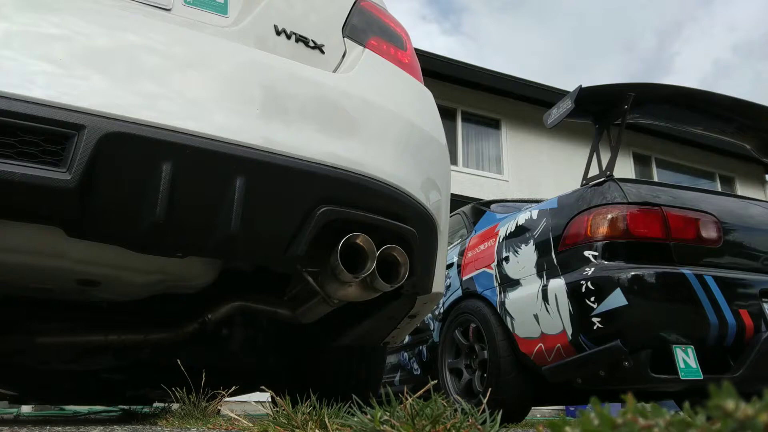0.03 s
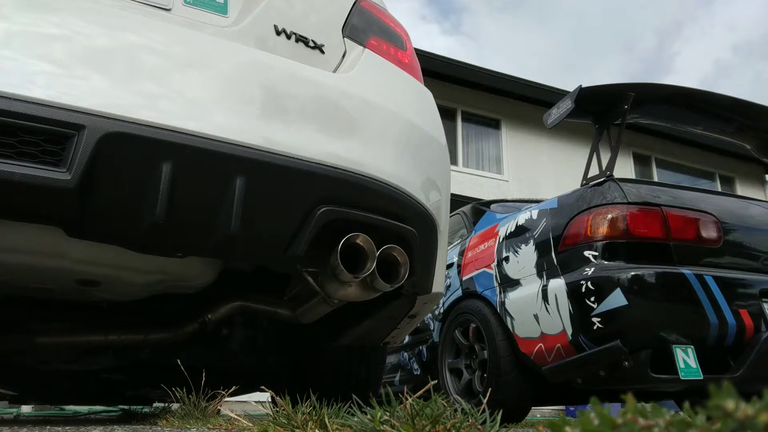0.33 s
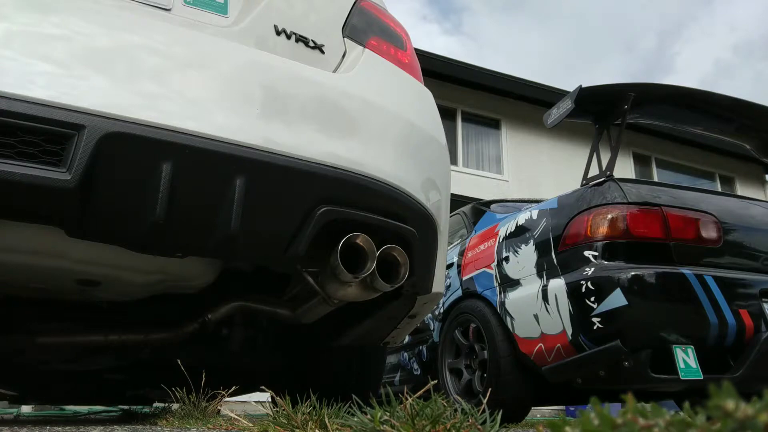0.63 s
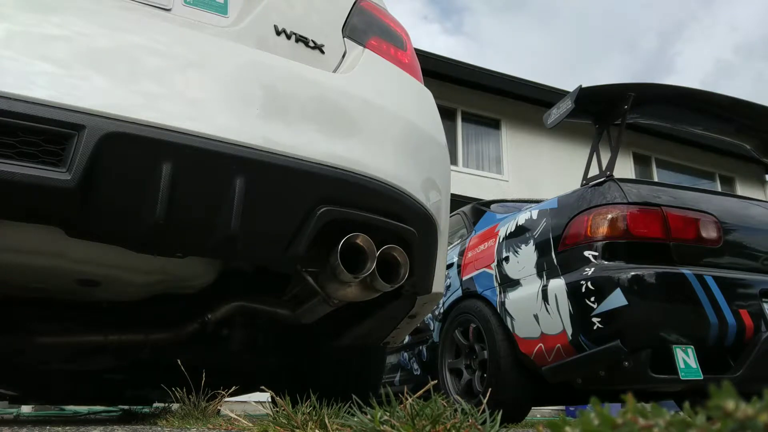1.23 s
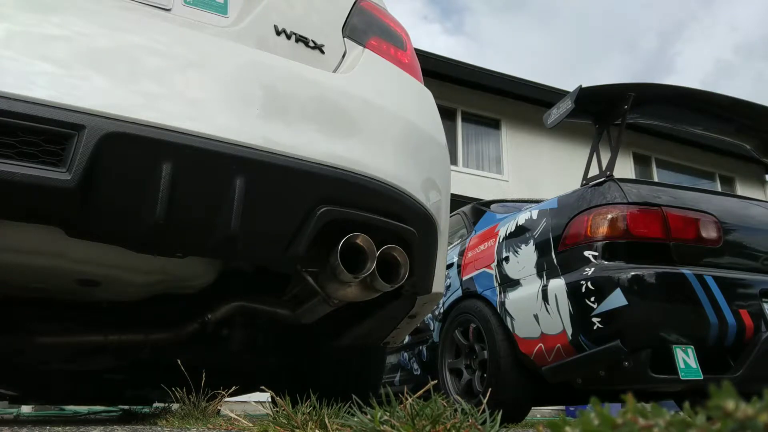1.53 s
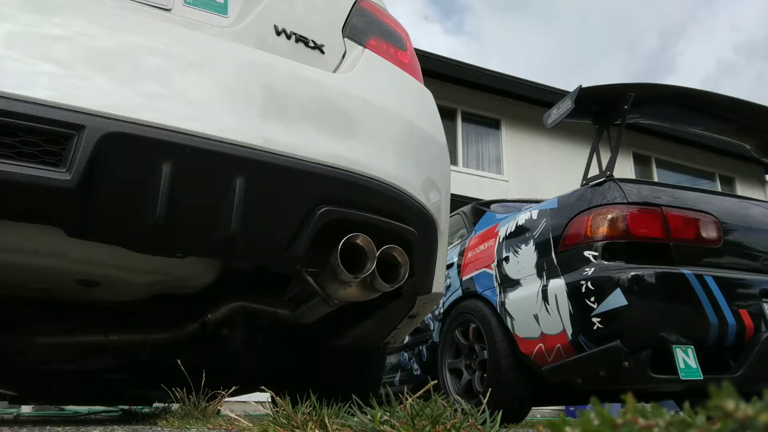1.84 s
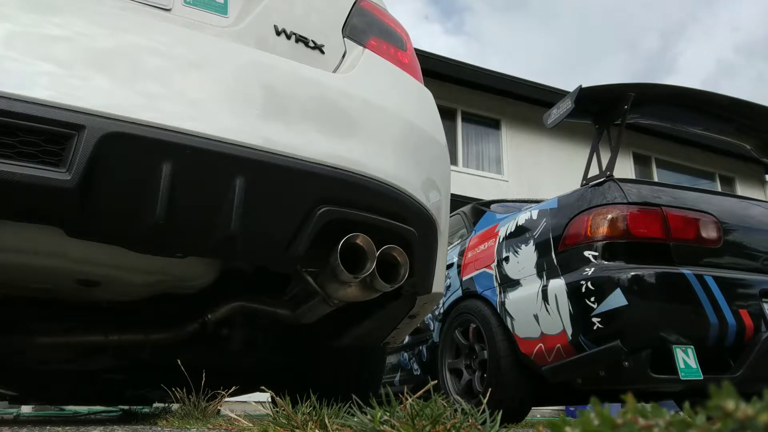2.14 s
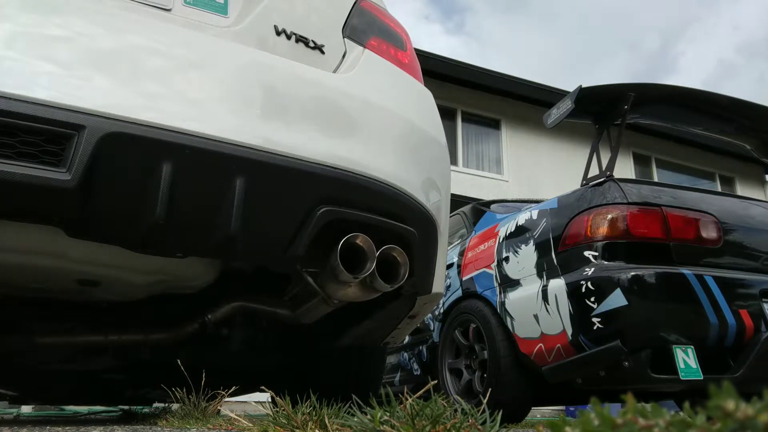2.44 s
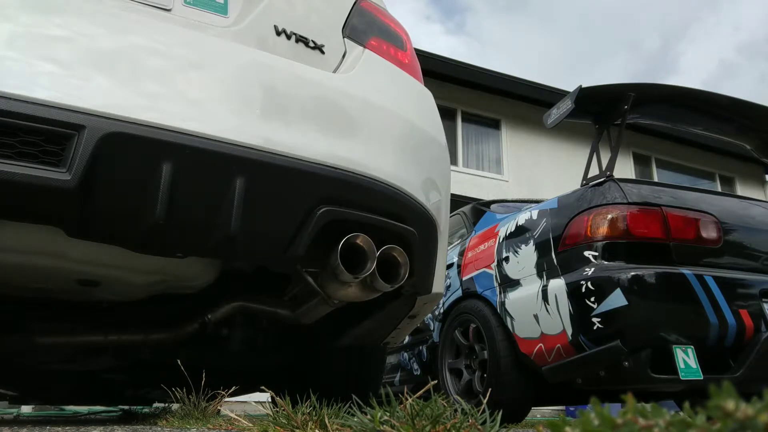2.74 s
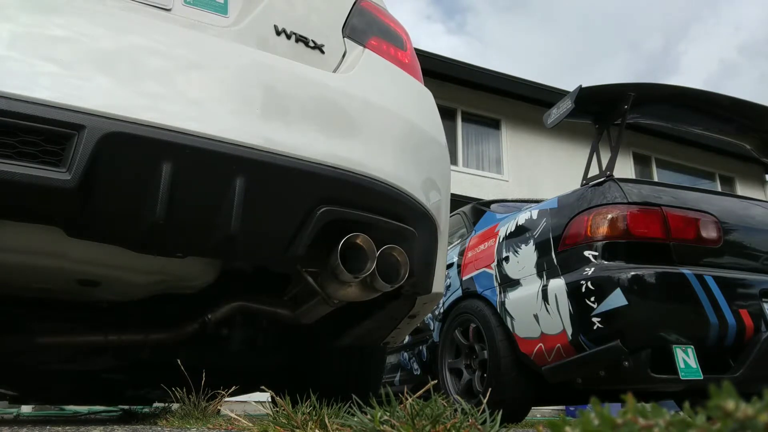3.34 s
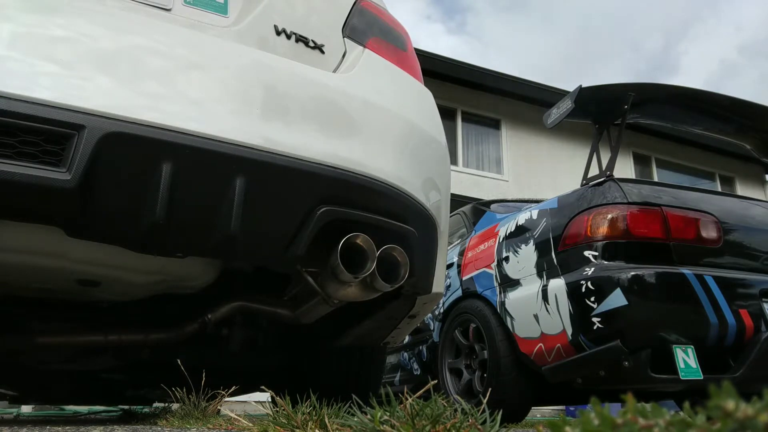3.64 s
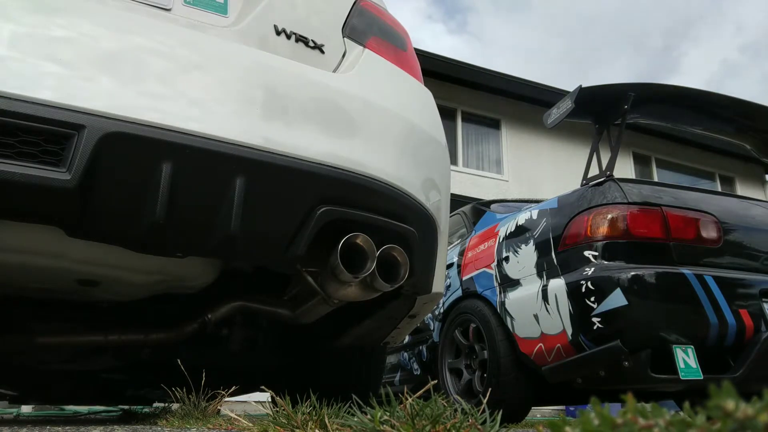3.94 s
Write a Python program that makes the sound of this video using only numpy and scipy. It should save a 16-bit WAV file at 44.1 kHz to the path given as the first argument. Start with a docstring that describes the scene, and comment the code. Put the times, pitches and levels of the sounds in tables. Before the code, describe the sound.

A car engine starts from cold, heard outdoors close to the tailpipes. At first there is only a quiet low rumble, joined at about 1.2 seconds by a faint, thin fuel pump whine and soft clunks. At 1.7 seconds the starter clacks in, grinding and rattling. The engine catches at 2.4 seconds with a few thumps, climbing by 3 seconds to a loud, uneven, raspy fast idle that continues.

```python
"""A flat-four car engine starts from cold, heard outdoors close to its tailpipes.
First the fuel pump whines, then the starter clacks in and its gears grind. The engine catches
with a few slow thumps and climbs to a hard, uneven fast idle: four unequal cylinders take turns
sending pulses of gas down the exhaust pipe. A low rumble lies behind it all."""
import sys
import numpy as np
from scipy import signal
from scipy.io import wavfile

SR = 44100
rng = np.random.default_rng(int(sys.argv[2]) if len(sys.argv) > 2 else 0)


def log_audio(samples):
    """Write samples as a 16-bit WAV file to the path given in sys.argv[1]."""
    # one column per channel
    frames = np.atleast_2d(samples).T
    # limit to full scale, then quantise
    limited = np.clip(frames, -1, 1)
    pcm = np.round(limited * 32767).astype(np.int16)
    wavfile.write(sys.argv[1], SR, pcm)


N = 176400
TIME = np.arange(N) / SR
MS = .001
FIRST_FIRING_S = 2.4319

# How fast the engine runs. Each row: time in seconds, firings per second.
ENGINE_SPEED = [(2.433, 17.87), (2.485, 20.52), (2.54, 37.25), (2.62, 44.45), (2.7, 53.53), (2.8, 62.79),
                (2.9, 67.33), (3.08, 72.19), (3.2, 70.52), (3.42, 73.45), (3.62, 72.3), (3.8, 73.51),
                (4.0, 74.39)]


def exhaust():
    """Four unequal cylinders fire in turn; each pulse booms, barks, burbles and rasps in the pipe."""
    # The cylinders in firing order. Each row: bark and rasp offsets in dB (before unevenness scales
    # them), lateness in ms, delay in ms of the echo in the header pipe, that echo's share of the pulse.
    cylinders = [(3.5, 5.5, 0.12, 3.22, 0.081), (0, -4, 0.016, 4.49, 0.04), (3.5, 2, 0.23, 0.96, 0.033),
                 (1, 2, -0.062, 2.3, 0.033)]
    # How much strong and weak cylinders differ. Each row: time in seconds, multiplier of the offsets.
    unevenness = [(2.5, 0.21), (2.9, 0.24), (3.0, 1.17), (3.26, 1.12), (3.4, 1.06), (3.7, 1.46),
                  (3.8, 1.85)]
    rate = curve(ENGINE_SPEED)
    progress = np.cumsum(rate * (TIME >= FIRST_FIRING_S)) / SR  # goes up by one per firing
    firings = np.arange(int(progress[-1]) + 1)
    at = np.searchsorted(progress, firings, side="right").clip(0, N - 1)  # sample of each firing
    bark_db, rasp_db, late_ms, echo_ms, echo_share = np.array(cylinders)[firings % len(cylinders)].T
    bark_scatter, rasp_scatter, jitter = rng.standard_normal((3, len(firings)))
    times = TIME[at] + (late_ms + .025 * jitter) * MS
    size = np.sqrt(SR / rate[at])  # faster firing alone does not add loudness
    uneven = curve(unevenness)[at]
    booms = boom(times, at, size)
    barks = bark(times, at, size * amp(uneven * bark_db + .45 * bark_scatter), echo_ms, echo_share)
    burbles = burble(times, at, size * amp(uneven * bark_db))
    rasps = rasp(times, at, size * amp(uneven * rasp_db + 1.2 * rasp_scatter))
    echoes = yard_echoes(amp(-27) * barks + amp(-7) * rasps)
    return booms + barks + burbles + rasps + echoes


def boom(times, at, size):
    """Each pulse of gas rings the low notes of the pipe and silencer."""
    # The boom's loudness. Each row: time in seconds, level in dB.
    levels = [(2.43, -28.5), (2.49, -22.5), (2.6, -21.5), (2.65, -16.5), (2.73, -21), (2.88, -18),
              (2.99, -19), (3.2, -18.5), (3.4, -17.5), (3.65, -19), (4, -17.5)]
    # The pipe's low ring. Each row: frequency in Hz, relative level in dB.
    tone = [(20, -64), (36, -17), (52, -4.5), (72, 0), (95, -1.5), (124, 6.5), (147, -13.5), (168, 0.5),
            (195, -26.5), (260, -14), (500, -81.5), (1000, -90), (12000, -130)]
    return colour(clicks(times, size * amp(curve(levels)[at])), tone)


def bark(times, at, size, echo_ms, echo_share):
    """Each pulse and its echo in the header pipe ring the exhaust's middle notes."""
    # The bark's loudness. Each row: time in seconds, base level in dB.
    levels = [(2.43, -45), (2.49, -46), (2.525, -30), (2.59, -42.5), (2.7, -29.5), (2.81, -41.5),
              (2.9, -23), (3.0, -30), (3.22, -26), (3.46, -19.5), (3.54, -21), (3.64, -25.5), (3.77, -21),
              (4, -22.5)]
    # The pipe's middle ring. Each row: frequency in Hz, relative level in dB.
    tone = [(100, -42), (190, -16.5), (220, -13.5), (250, -11), (292, -3), (325, 3), (360, -24), (440, 3),
            (480, 4.5), (515, 0.5), (585, 2.5), (665, -6.5), (740, -7), (850, -10.5), (990, -20),
            (1100, -9), (1280, -39.5), (1500, -48), (3000, -73.5), (12000, -115)]
    strength = size * amp(curve(levels)[at])
    pulses = clicks(times, strength) + clicks(times + echo_ms * MS, strength * echo_share)
    return colour(pulses + .03 * puffs(pulses, decay_s=.007), tone)


def burble(times, at, size):
    """Rough gas follows each pulse, strongest while the cold engine is still settling."""
    # The burble's loudness. Each row: time in seconds, base level in dB.
    levels = [(2.43, -46), (2.53, -32), (2.6, -37), (2.7, -33), (2.82, -35), (2.9, -27), (3.0, -31),
              (3.12, -30.5), (3.3, -31), (3.6, -34), (4, -34)]
    # The burble's tone. Each row: frequency in Hz, relative level in dB.
    tone = [(120, -24), (200, -14), (290, 4.5), (360, 2), (450, 7), (580, -14), (720, 1), (850, -8.5),
            (1000, -14.5), (1500, -53), (3000, -76), (12000, -110)]
    pulses = clicks(times, size * amp(curve(levels)[at]))
    return colour(puffs(pulses, decay_s=.012), tone)


def rasp(times, at, size):
    """A sharp crack and a puff of gas just after each firing ring the pipe's upper notes."""
    # The rasp's loudness. Each row: time in seconds, base level in dB.
    levels = [(2.43, -51.5), (2.487, -42.5), (2.525, -39), (2.6, -45), (2.7, -40.5), (2.83, -42),
              (2.92, -39.5), (3.1, -37.5), (3.42, -32), (3.66, -37.5), (3.77, -33), (4, -35)]
    # The pipe's upper ring. Each row: frequency in Hz, relative level in dB.
    tone = [(300, -11.5), (600, -11), (830, 7.5), (990, -5.5), (1100, 4.5), (1280, -7.5), (1450, -16),
            (1750, -25.5), (2100, -23), (2500, -31), (2900, -20.5), (3700, -39), (5000, -57), (9000, -62.5),
            (12000, -91.5)]
    cracks = clicks(times + 1.1 * MS, size * amp(curve(levels)[at]))
    return colour(.9 * cracks + .6 * puffs(cracks, decay_s=.007), tone)


def tailpipe_hiss():
    """Gas hisses out of the tailpipes, louder as the engine speeds up."""
    # The hiss's tone. Each row: frequency in Hz, relative level in dB.
    tone = [(1470, -26.5), (2500, -7.5), (2850, -5), (3540, -10.5), (4660, -19.5), (5450, -15.5),
            (7480, -21), (8380, -23), (9170, -16.5), (10500, -49), (13600, -61), (22000, -120)]
    rate = curve(ENGINE_SPEED)
    flow = (TIME > FIRST_FIRING_S) * np.sqrt(rate / rate.max())
    return amp(-59) * colour(noise(), tone) * flow


def starter():
    """The starter's gears grind and whine and its housing rings, while the turning engine chugs."""
    # The grinding's loudness. Each row: time in seconds, base level in dB.
    grind_levels = [(1.683, -70), (1.695, -52), (1.76, -47.5), (1.82, -45), (1.86, -44.5), (1.96, -42.5),
                    (2.04, -42.5), (2.11, -47), (2.16, -46.5), (2.3, -46.5), (2.41, -40), (2.5, -46.5),
                    (2.6, -47), (2.65, -60), (2.75, -69)]
    # The grinding's tone. Each row: frequency in Hz, relative level in dB.
    grind_tone = [(240, -40.5), (400, -13.5), (540, -2.5), (663, -15.5), (781, 4.5), (999, -19), (1230, 1),
                  (1440, -15.5), (1680, -13.5), (2460, -1.5), (2940, -8.5), (3410, -4.5), (4490, -13),
                  (5890, -8), (6400, -13.5), (6940, -9.5), (8290, -7), (9380, -18.5), (10500, -27),
                  (13600, -54.5), (22000, -120)]
    # The housing's notes. Each row: frequency in Hz, width in Hz, level in dB relative to the grinding.
    housing_notes = [(800, 36, -20), (941, 80, -14), (2513, 22, -11), (2650, 40, -15.5), (3210, 31, -13.5),
                     (4680, 44, -14.5)]
    # How often gear teeth meet. Each row: time in seconds, rate in Hz.
    tooth_rate = [(1.7, 1000), (1.78, 1299.5), (1.83, 1399.5), (1.93, 1470.5), (2.0, 1383.5), (2.07, 1259),
                  (2.18, 1394), (2.3, 1297.5), (2.45, 1503.5), (2.65, 1594.5)]
    # The whine's tone: relative levels in dB of the first six multiples of that rate.
    harmonics_db = [-18.5, -20, -12, -3.5, 2, -3]
    # The whine's loudness. Each row: time in seconds, level in dB.
    whine_levels = [(1.7, -79), (1.77, -51), (1.82, -41), (1.87, -50.5), (1.94, -40), (2.04, -43.5),
                    (2.1, -57), (2.4, -69), (2.65, -74)]
    grind = colour(clatter(), grind_tone)
    housing = sum(amp(db) * whistle(hz, width) for hz, width, db in housing_notes)
    whine = unit(sum(amp(db) * whistle(k * curve(tooth_rate), width_hz=510)
                     for k, db in enumerate(harmonics_db, 1)))
    chug = amp(-.5) * whistle(67.6, width_hz=18)
    cranking = (grind + housing + chug) * amp(curve(grind_levels))
    running = (TIME > 1.683) & (TIME < 2.75)
    return running * (cranking + whine * amp(curve(whine_levels)))


def starter_clack():
    """The starter's small gear hits the engine's big ring gear."""
    # The clack's tone. Each row: frequency in Hz, relative level in dB.
    tone = [(150, -9), (550, -5.5), (850, 4), (1300, -10), (1700, -8), (2500, 0.5), (3250, 2.5),
            (4000, -13), (5300, -11), (8200, -8.5), (9500, -16), (11000, -33), (15000, -35)]
    return colour(clatter() * burst(1.699, db=-25.5, rise_s=.022, decay_s=.024), tone)


def gear_rattles():
    """The slack between the gears rattles as the pistons go over compression."""
    # The rattles. Each row: start in seconds, level in dB, decay time in seconds.
    rattles = [(1.996, -35, 0.037), (2.176, -32, 0.048), (2.335, -32, 0.039)]
    # Their tone. Each row: frequency in Hz, relative level in dB.
    tone = [(200, 10.5), (500, 3.5), (850, 14.5), (1600, -5), (2700, 5), (4500, -7), (6000, 3), (8200, 5),
            (9400, 1.5), (11000, -30), (15000, -41)]
    envelope = sum(burst(start, db, rise_s=.0084, decay_s=decay) for start, db, decay in rattles)
    return colour(clatter() * envelope, tone)


def fuel_pump():
    """The fuel pump gives a thin, slightly wavering whine and a faint hiss."""
    # The pump's notes. Each row: frequency in Hz, relative level in dB.
    notes = [(6228, -83), (7494, -91), (7709, -82.5), (7811, -85.5), (8129, -76.5), (8236, -83)]
    # The pump comes in, holds, and eases once the engine runs. Each row: time in seconds, gain in dB.
    levels = [(1.15, -50), (1.22, -7), (1.3, -1), (2.6, 2), (2.9, -4.5)]
    waver_hz = 14 * whistle(0, width_hz=30)
    whine = np.zeros(N)
    for hz, db in notes:
        phase = 2 * np.pi * np.cumsum(hz + waver_hz) / SR
        fuzz = .61 * whistle(hz, width_hz=90)
        whine += amp(db + 1.5) * (np.sin(phase) + fuzz)
    hiss = amp(-70) * whistle(7940, width_hz=1500)
    return (whine + hiss) * amp(curve(levels))


def clunks():
    """A few soft clunks come before the starter turns."""
    # The clunks. Each row: start in seconds, level in dB, decay time in seconds.
    knocks = [(1.22, -57.5, 0.04), (1.297, -55, 0.047), (1.55, -49.5, 0.019)]
    # Their tone. Each row: frequency in Hz, relative level in dB.
    tone = [(200, -15), (500, -3), (950, -4.5), (1500, -22), (3200, -26), (5000, -29), (12000, -55)]
    envelope = sum(burst(start, db, rise_s=.0027, decay_s=decay) for start, db, decay in knocks)
    return colour(noise() * envelope, tone)


def yard_echoes(x):
    """Short scattered echoes from the ground, the cars and the house wall."""
    fade = amp(-60 * TIME / .05)  # down 60 dB in 50 ms
    tail = noise() * (rng.random(N) < .05) * fade * (TIME > .004)
    return signal.fftconvolve(x, tail / np.linalg.norm(tail))[:N]


def background():
    """A low, faintly throbbing rumble with a drone and a little airy hiss above it."""
    # The rumble's tone. Each row: frequency in Hz, relative level in dB.
    rumble_tone = [(12, -72), (20, -38.5), (42, -15), (58, -6), (75, 3.5), (108, -9), (136, -4),
                   (182, -9.5), (218, -15.5), (288, -9.5), (368, -21), (406, -25.5), (441, -25),
                   (1000, -41.5), (1300, -60.5), (2200, -120)]
    # The rumble's slow swell. Each row: time in seconds, gain in dB.
    swell = [(.1, -2), (.5, -2.5), (.85, -3), (1.1, -3.5), (1.35, -1.5), (1.6, -2), (2.3, -2.5)]
    # The drone's loudness. Each row: time in seconds, level in dB.
    drone_levels = [(.1, -60), (.55, -49.5), (.9, -60), (1.5, -84), (1.8, -53), (2.4, -73)]
    # The airy hiss's tone. Each row: frequency in Hz, relative level in dB.
    air_tone = [(500, -16), (1000, -1.5), (1600, -6), (3000, -5.5), (5500, -10), (9000, -17.5),
                (11000, -20), (15500, -23.5)]
    throb = unit(1 + .13 * whistle(15.5, width_hz=4))
    rumble = amp(-41 + curve(swell)) * colour(noise() * throb, rumble_tone)
    drone = amp(curve(drone_levels)) * whistle(297.4, width_hz=100)
    air = amp(-70.5) * colour(noise(), air_tone)
    return rumble + drone + air


def puffs(train, decay_s):
    """Swirling gas that follows each pulse and dies quickly."""
    r = np.exp(-2 / (decay_s * SR))
    power = signal.lfilter([1 - r], [1, -r], train ** 2)
    return noise() * np.sqrt(power)


def clatter(hits_per_s=3500, spread_db=2):
    """Gear teeth make dense random hits, a few of them large."""
    size = amp(spread_db * np.minimum(rng.exponential(1, N), 4))
    return unit(size * np.sign(noise()) * (rng.random(N) < hits_per_s / SR))


def whistle(hz, width_hz):
    """A band of noise around a pitch that may move; at 0 Hz it is a slow wander."""
    r = np.exp(-np.pi * width_hz / SR)
    wander = signal.lfilter([1], [1, -2 * r, r * r], noise() + 1j * noise())
    phase = 2 * np.pi * np.cumsum(hz * np.ones(N)) / SR
    return unit((wander * np.exp(1j * phase)).real)


def colour(x, tone):
    """Gives x the tone of a (Hz, dB) table; white noise keeps its overall level."""
    table_hz, db = np.transpose(tone)
    hz = abs(np.fft.fftfreq(16384, 1 / SR))
    log_gain = np.log(amp(np.interp(np.log(hz + 1), np.log(table_hz + 1), db)))
    response = np.exp(np.conj(signal.hilbert(log_gain)))  # rings after a hit, never before
    ring = np.fft.ifft(response).real[:6000] * np.hanning(12000)[6000:] ** .5
    return signal.oaconvolve(x, ring / np.linalg.norm(ring))[:N]


def burst(start_s, db, rise_s, decay_s):
    """A loudness shape that rises quickly and dies away."""
    age = np.maximum(TIME - start_s, 0)
    return amp(db) * np.minimum(age / rise_s, 1) * np.exp(-age / decay_s)


def clicks(times, sizes):
    """One single-sample click at each time."""
    samples = np.clip(np.round(times * SR).astype(int), 0, N)
    return np.bincount(samples, sizes, N + 1)[:N]


def curve(points):
    """Joins (seconds, value) points by straight lines."""
    return np.interp(TIME, *np.transpose(points))


def noise():
    """White noise with an average (rms) level of 1."""
    return rng.standard_normal(N)


def amp(db):
    """Turns decibels into a gain."""
    return 10 ** (np.asarray(db) / 20)


def unit(x):
    """Scales x to an average (rms) level of 1."""
    return x / np.sqrt(np.mean(x ** 2) + 1e-20)


def scene():
    """All the sources, heard from one spot."""
    before_firing = background() + fuel_pump() + clunks() + starter() + starter_clack() + gear_rattles()
    return (before_firing + exhaust() + tailpipe_hiss())[None]


def record(dry):
    """The sound opens after a moment of near silence; the highest treble is cut off steeply."""
    opened = dry * np.clip((TIME - .0736) / .01, .005, 1)
    low_pass = signal.firwin(511, 15700, window=("kaiser", 9), fs=SR)
    return signal.oaconvolve(opened, low_pass[None], "same")


dry = scene()
out = record(dry)
log_audio(out)
```